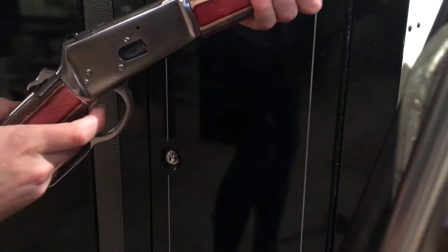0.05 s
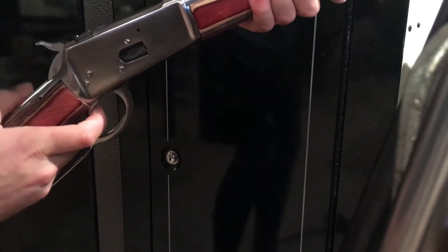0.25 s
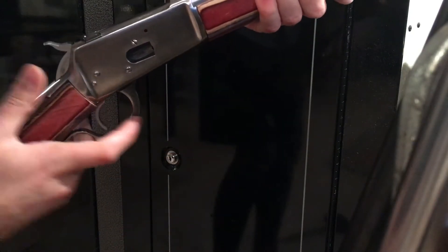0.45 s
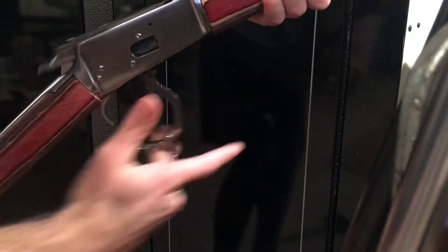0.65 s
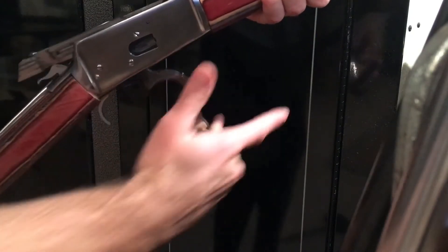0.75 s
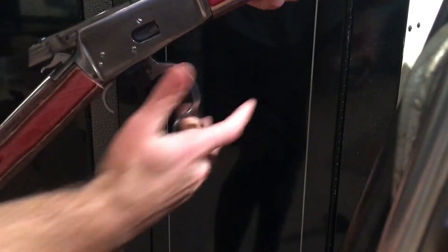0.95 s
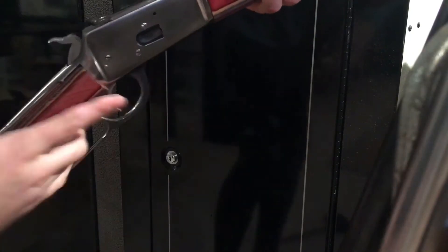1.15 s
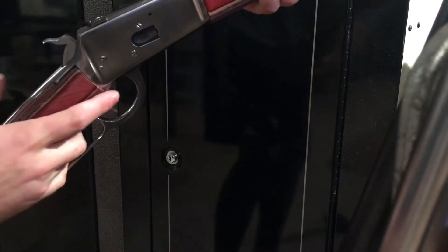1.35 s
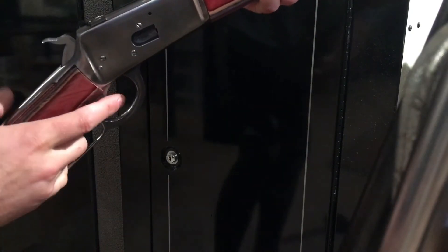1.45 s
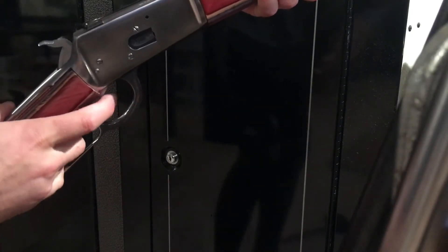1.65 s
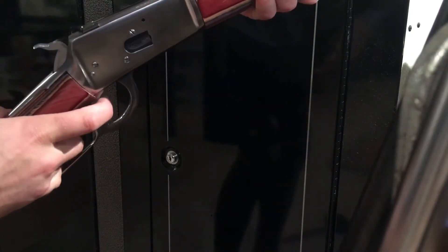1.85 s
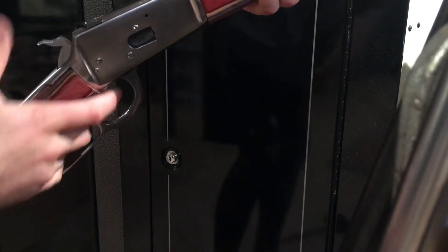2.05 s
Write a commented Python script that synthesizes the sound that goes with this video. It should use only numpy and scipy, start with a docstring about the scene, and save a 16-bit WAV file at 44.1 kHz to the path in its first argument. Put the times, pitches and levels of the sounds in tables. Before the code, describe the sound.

Close metallic clacks of a lever-action rifle as its hammer is cocked and lever worked.

```python
"""A lever-action rifle is handled close up in a small room, over faint hiss and low room noise.
At 0.2 s the hammer is cocked: its notches snap, its spring rings and the stock thumps deeply.
From 0.55 s the lever is thrown open; bolt and locking parts slide and clack against the steel receiver.
From about 1.05 s it is pulled shut and the locking bolts grind home.
Two light ticks follow, near 1.8 and 2.1 s."""
import sys
import numpy as np
from scipy import signal
from scipy.fft import rfft, irfft
from scipy.io import wavfile

SR = 44100
rng = np.random.default_rng(int(sys.argv[2]) if len(sys.argv) > 2 else 0)


def master(y):
    """Save y as 16-bit WAV."""
    cut = np.clip(np.atleast_2d(y).T, -1, 1)
    pcm = np.round(cut * 32767)  # scale
    wavfile.write(sys.argv[1], SR, pcm.astype(np.int16))


N = 92610
TIME = np.arange(N) / SR


def from_db(db):
    """Decibels to gain."""
    return 10 ** (np.asarray(db) / 20)


def unit_rms(x):
    """Scale to rms 1."""
    return x / np.sqrt(np.mean(x ** 2) + 1e-20)


def envelope(points):
    """Gain over time from (s, dB) points."""
    return from_db(np.interp(TIME, *np.transpose(points)))


def at_hz(points, hz):
    """Read (Hz, value) points on a log-frequency axis."""
    points_hz, values = np.transpose(points)
    return np.interp(np.log(hz), np.log(points_hz), values)


def band(x, low_hz, high_hz, order=2):
    """Causal band-pass."""
    sos = signal.butter(order, [low_hz, min(high_hz, .45 * SR)], "band", fs=SR, output="sos")
    return signal.sosfilt(sos, x + 1e-18)


def colour(x, spectrum):
    """Shape a steady noise by (Hz, dB) points; rms 1."""
    hz = np.maximum(np.arange(N // 2 + 1) * SR / N, 1)
    return unit_rms(irfft(rfft(x) * from_db(at_hz(spectrum, hz)), N))


def noise(spectrum):
    """Coloured noise, rms 1."""
    return colour(rng.standard_normal(N), spectrum)


def ring(clicks, hz, t60_s):
    """One damped mode: a unit click starts a tone of height 1; it radiates no bass."""
    radius, angle = from_db(-60 / (t60_s * SR)), 2 * np.pi * hz / SR
    return signal.lfilter([.5, 0, -.5], [1, -2 * radius * np.cos(angle), radius ** 2], clicks + 1e-18)


def add(out, start_s, sound):
    """Mix a sound into out."""
    i = int(start_s * SR)
    out[i:i + len(sound)] += sound[:max(N - i, 0)]


def background():
    """Faint hiss and low room noise, both uneven in level."""
    # Each row: time in seconds, level in dB.
    hiss_levels = [(0, -69), (.06, -68.5), (.07, -81.5), (.185, -82), (.2, -70), (.58, -68), (1.35, -69.5),
                   (1.48, -65.5), (1.6, -66), (1.65, -69.5), (1.85, -71.5), (2.1, -76)]
    air_levels = [(0, -69), (.1, -75.5), (.45, -79.5), (.85, -64), (1.32, -69), (1.5, -66.5), (1.8, -71),
                  (2.1, -74)]
    # Each row: frequency in Hz, relative density in dB.
    hiss_spectrum = [(100, -11), (700, -2), (1400, 0), (2300, -1.5), (5000, -5.5), (9000, -8), (12000, -10)]
    air_spectrum = [(25, -2), (60, 2.5), (130, 0.5), (330, 2), (600, -7.5), (1200, -26), (4000, -45.5)]
    return envelope(hiss_levels) * noise(hiss_spectrum) + envelope(air_levels) * noise(air_spectrum)


def room(x, bands=14, onset_s=.0032):
    """A diffuse tail that builds up quickly and dies band by band."""
    # Each row: frequency in Hz, T60 in seconds.
    decay_times = [(200, .18), (530, 0.3), (1400, 0.33), (3700, 0.32), (9700, 0.25), (15000, 0.19)]
    # Each row: frequency in Hz, relative level in dB.
    spectrum = [(100, -14.5), (550, -7.5), (870, 10), (1300, -0.5), (2100, 1.5), (5000, -0.5), (9000, 0.5),
                (15000, -4.5)]
    t, edges_hz = TIME[:SR // 2], np.geomspace(100, 17000, bands + 1)
    tail = np.zeros(len(t))
    for low_hz, high_hz in zip(edges_hz, edges_hz[1:]):
        hz = np.sqrt(low_hz * high_hz)
        fade = from_db(at_hz(spectrum, hz) - 60 * t / at_hz(decay_times, hz))
        tail += band(rng.standard_normal(len(t)), low_hz, high_hz) * fade
    tail *= 1 - np.exp(-(t / onset_s) ** 2)
    return signal.fftconvolve(x, tail / np.sqrt(np.sum(tail ** 2)))[:N]


def echo(x, delay_ms=7.4, gain_db=-18.5):
    """One reflection from a hard surface close to the rifle."""
    return from_db(gain_db) * np.pad(x, (round(delay_ms * SR / 1000), 0))[:N]


def rumble():
    """Low handling noise, strongest as the hammer is cocked."""
    # Each row: time in seconds, level in dB.
    levels = [(0, -81), (.185, -76), (.21, -27.5), (.275, -65.5), (.32, -64), (.37, -86.5), (.80, -76.5),
              (.95, -54.5), (1.13, -62), (1.2, -75.5), (1.3, -82)]
    # Each row: frequency in Hz, relative density in dB.
    spectrum = [(25, -7.5), (50, 3.5), (85, -2.5), (150, -15.5), (300, -36.5), (1000, -61)]
    return envelope(levels) * noise(spectrum)


def bumps():
    """Soft bumps of hand and stock sway the rifle for a few low cycles."""
    # Each row: start in seconds, level in dB, frequency in Hz, rise in seconds.
    sways = [(0.686, -50, 120, .002), (0.929, -46.5, 85, 0.0092), (1.016, -51.5, 95, .008)]
    out = np.zeros(N)
    for start_s, db, hz, rise_s in sways:
        swell = TIME / rise_s * np.exp(1 - TIME / rise_s)
        add(out, start_s, from_db(db) * swell * np.sin(2 * np.pi * hz * TIME))
    return out


def bolt_slide(grains_per_s=5000, spread_db=4):
    """The bolt rubs on its rails: a stream of tiny catches of uneven size."""
    # Each row: time in seconds, level in dB.
    levels = [(.6, -86), (.635, -45), (.70, -43.5), (.745, -43.5), (.79, -49.5), (.86, -54), (.92, -61),
              (1.045, -63.5), (1.078, -41), (1.15, -38), (1.19, -45.5), (1.225, -53), (1.26, -85)]
    # Each row: frequency in Hz, relative density in dB.
    spectrum = [(150, -24.5), (600, -13.5), (900, -2.5), (1800, 1.5), (3000, -5), (7000, -12),
                (15000, -16.5)]
    sizes = from_db(spread_db * np.minimum(rng.exponential(1, N), 4)) * rng.choice([-1, 1], N)
    grains = sizes * (rng.random(N) < grains_per_s / SR)
    return envelope(levels) * colour(grains, spectrum)


def grind(start_s=1.112, end_s=1.165, edge_s=.005, level_db=-35.5, catches_per_s=900, decay_s=.0004):
    """The locking bolts stick and slip under load: a fast, uneven run of tiny bright bursts."""
    # Each row: frequency in Hz, relative density in dB.
    spectrum = [(800, -16.5), (1500, 4), (6000, -3), (7100, 14), (8000, -1), (15000, -6.5)]
    catches = (rng.random(N) < catches_per_s / SR) * rng.uniform(.5, 1, N)
    bursts = signal.lfilter([1], [1, -np.exp(-1 / (decay_s * SR))], catches) * rng.standard_normal(N)
    load = (np.tanh((TIME - start_s) / edge_s) - np.tanh((TIME - end_s) / edge_s)) / 2
    return from_db(level_db) * load * colour(bursts, spectrum)


def clacks(contacts, modes, attack_ms=.15, crack_db=12, stock_db=-19.5, ring_db=.5, spread_db=1.5):
    """Steel hits steel: a crack, a damped clatter and the part's own ring; shared modes ring along."""
    stock_hz, edges_hz = (264, 1120), (1150, 2700, 8000, 15300)   # edges of body, bite and sizzle
    bands_hz = [stock_hz, *zip(edges_hz, edges_hz[1:])]
    out, t_ms = np.zeros(N), 1000 * TIME[:4096]
    impulse = 1.0 * (t_ms == 0)
    for start_s, *levels_db, decay_ms, own_hz in contacts:
        fade = np.exp(-t_ms / decay_ms)
        shape = from_db(crack_db) * impulse + (1 - np.exp(-t_ms / attack_ms)) * fade
        knock_db = levels_db[0] + stock_db   # the wooden stock knocks along
        for band_hz, db in zip(bands_hz, (knock_db, *levels_db)):
            burst = band(shape * rng.choice([-1, 1], len(t_ms)), *band_hz, order=3)
            add(out, start_s, from_db(db) * unit_rms(burst) * np.sqrt(np.mean(fade ** 2)))
        own_db = levels_db[np.searchsorted(edges_hz[1:-1], own_hz)] + ring_db
        own_t60_s = .03 / np.hypot(1, own_hz / 5000)   # higher rings die sooner
        add(out, start_s, from_db(own_db) * ring(impulse, own_hz, own_t60_s))
    contacts = np.array(contacts)
    starts = (contacts[:, 0] * SR).astype(int)
    for hz, db, t60_s in modes:
        band_db = contacts[:, 1 + np.searchsorted(edges_hz[1:-1], hz)]
        strike_db = band_db + db + rng.normal(0, spread_db, len(starts))
        clicks = np.zeros(N)
        clicks[starts] = from_db(strike_db) * rng.choice([-1, 1], len(starts))
        out += ring(clicks, hz, t60_s)
    return out


def thump(peak_s=.2292, level_db=-7, rise_s=.0099, fall_s=.016):
    """The deep part of the cocking jolt: a tone that sinks while it swells and dies."""
    top_hz, end_hz, sink_start_s, sink_s = 211, 46.3, .2205, .0041
    hz = end_hz + (top_hz - end_hz) * np.exp(-np.maximum(TIME - sink_start_s, 0) / sink_s)
    cycles = np.cumsum(hz) / SR
    cycles -= np.interp(peak_s, TIME, cycles)   # zero crossing at the top of the swell
    t = TIME - peak_s
    swell = np.exp(-(t / np.where(t < 0, rise_s, fall_s)) ** 2)
    return from_db(level_db) * swell * np.sin(2 * np.pi * cycles)


def stock_knock(jolt_s=.2175, peak_s=.22, knock_db=-20, rise_s=.0055, fall_s=.0047):
    """The hammer jolts the stock: a dull knock and a short wooden ring."""
    # Each row: frequency in Hz, relative density in dB.
    spectrum = [(60, -5.5), (200, 5.5), (400, -5.5), (750, -5), (1100, -19.5), (3000, -51)]
    # Each row: frequency in Hz, level in dB, T60 in seconds.
    modes = [(243, -20.5, .04), (415, -17, 0.035), (632, -16.5, 0.024), (887, -30, 0.061)]
    t = TIME - peak_s
    knock = noise(spectrum) * np.exp(-abs(t) / np.where(t < 0, rise_s, fall_s))
    jolt = 1.0 * (np.arange(N) == int(jolt_s * SR))
    wood = sum(from_db(db) * ring(jolt, hz, t60_s) for hz, db, t60_s in modes)
    return from_db(knock_db) * knock + wood


def hammer():
    """The hammer snaps over its notches; hammer and spring ring, with a long, high ting."""
    # Each row: start in seconds, body, bite and sizzle in dB, decay in ms, own ring in Hz.
    notches = [(.1952, -50, -47, -45, 4.5, 5160), (.2075, -48, -45.5, -47, 35, 3190),
               (.2180, -18, -14.5, -16.5, 2.8, 9550), (.2235, -27.5, -27, -22.5, 5.6, 4450),
               (.2292, -30, -32, -27.5, 6.2, 9250)]
    # Each row: frequency in Hz, level relative to the strike in dB, T60 in seconds.
    spring_modes = [(2200, -13.5, 0.062), (3380, -12.5, 0.027), (4450, -12.5, 0.043), (6500, -12, 0.05)]
    ting_modes = [(11631, -26, .24), (11737, -22, .27), (11785, -26, .24)]
    return clacks(notches, spring_modes + ting_modes)


def lever_action():
    """Lever, bolt and lock clack against the receiver, slide and grind home; two late ticks."""
    # Each row: start in seconds, body, bite and sizzle in dB, decay in ms, own ring in Hz.
    contacts = [ (.5460, -58, -60.5, -75.5, 5.3, 1514), (.6135, -46, -49.5, -54.5, 3.5, 2286),
                (.6327, -42.5, -41.5, -49, 11, 4200), (.6364, -38.5, -29.5, -27.5, 1.8, 14700),
                (.6562, -23.5, -22.5, -21.5, 6.4, 4080), (.6706, -38.5, -33.5, -33.5, 1.6, 7340),
                (.6852, -18.5, -17.5, -16.5, 4.26, 4595), (.7228, -28.5, -33.5, -39, 4.6, 2110),
                (.7295, -33.5, -36.5, -41.5, 3.7, 2040), (.7535, -38.5, -38, -41.5, 3.7, 3610),
                (.7925, -49, -42.5, -40.5, 1.9, 15250), (.8142, -32.5, -31, -33, 5.2, 6530),
                (.8365, -43.5, -46.5, -33.5, 1.5, 14000), (.8403, -22, -27.5, -24, 2.64, 15200),
                (.8462, -33, -37.5, -36, 2.1, 2200), (.9470, -36.5, -40, -51, 3, 2210),
                (.9595, -39.5, -51.5, -54.5, 4.7, 2290), (.9782, -44.5, -37.5, -35, 3.1, 11500),
                (1.0258, -47.5, -54, -61, 2.5, 1630), (1.0598, -41.5, -45.5, -52, 3.2, 1560),
                (1.0895, -30.5, -39.5, -35.5, 1.4, 14100), (1.0983, -29, -24, -29.5, 2, 3000),
                (1.1042, -24, -18.5, -17.5, 4.1, 1910), (1.1175, -32.5, -27.5, -36.5, 3.7, 2950),
                (1.1202, -21, -27.5, -36.5, 4.5, 1513), (1.1247, -30, -23, -17, 2.2, 13500),
                (1.1305, -32, -30.5, -33, 2.1, 11300), (1.1415, -31, -23.5, -24.5, 4, 7120),
                (1.1554, -22, -18, -20, 3.4, 1545), (1.1995, -53, -45, -38, 1.5, 9300),
                (1.2078, -34, -42, -33, 2.3, 2014), (1.2160, -46.5, -27, -22.5, 2.4, 12500),
                (1.2272, -22, -25.5, -33.5, 2.47, 2278), (1.2335, -42, -31, -32.5, 1.45, 3440),
                (1.8325, -49, -51.5, -55.5, 5.3, 2210), (2.0750, -46.5, -51, -56.5, 4.3, 2170)]
    # Each row: frequency in Hz, level relative to the strike in dB, T60 in seconds.
    receiver_modes = [(1260, -25.5, 0.037), (1530, -12, 0.039), (1977, -6.5, 0.043), (2159, -12.5, 0.07),
                      (2236, -3.5, 0.051), (2950, -25.5, 0.027), (4190, -14.5, 0.037), (7120, -24, 0.051),
                      (11300, -22.5, 0.033), (11300, -17.5, 0.025)]
    return clacks(contacts, receiver_modes) + bolt_slide() + grind()


def scene(hammer_room_db=-12.5, action_room_db=-18.5):
    """Background, room, handling, cocking and lever action in mono."""
    snap, action = hammer(), lever_action()
    tail = room(from_db(hammer_room_db) * snap + from_db(action_room_db) * action)
    ambience = background() + tail + echo(action)
    cocking = snap + thump() + stock_knock()
    return (ambience + rumble() + bumps() + cocking + action)[None]


def record(dry, ceiling=.5, cutoff_hz=15850):
    """Round the highest peaks, then low-pass steeply."""
    limited = dry / (1 + (dry / ceiling) ** 8) ** (1 / 8)
    return signal.sosfilt(signal.ellip(10, .1, 80, cutoff_hz, fs=SR, output="sos"), limited)


dry = scene()
out = record(dry)
master(out)
```